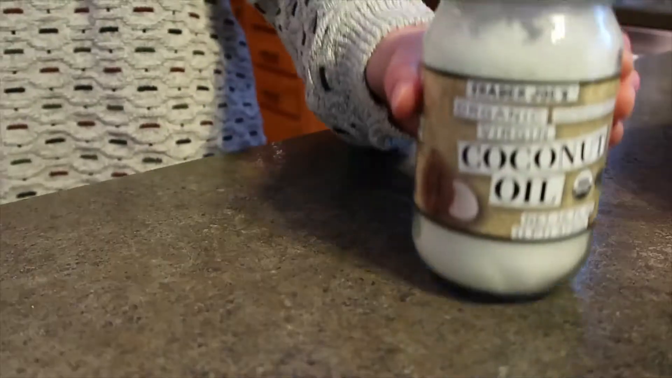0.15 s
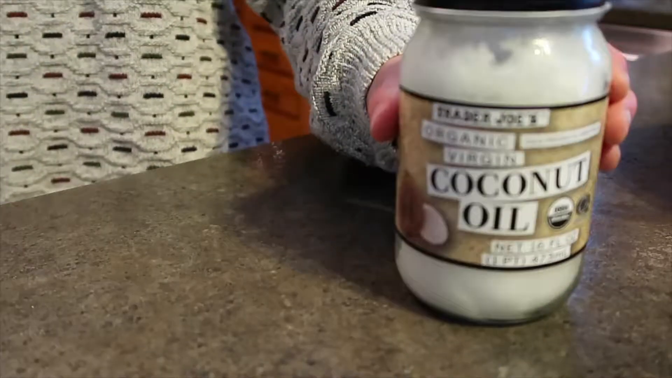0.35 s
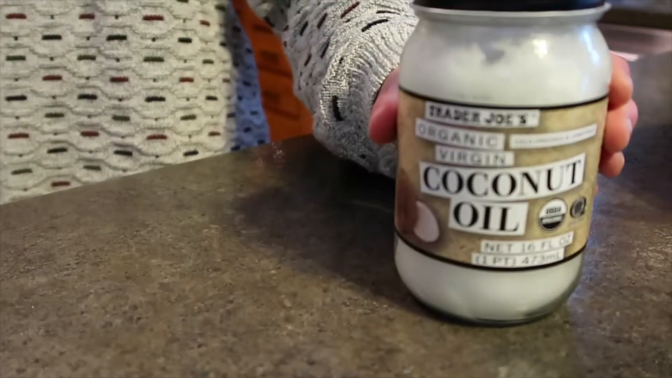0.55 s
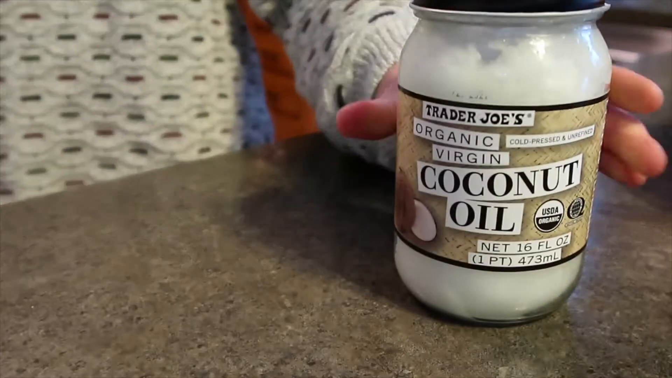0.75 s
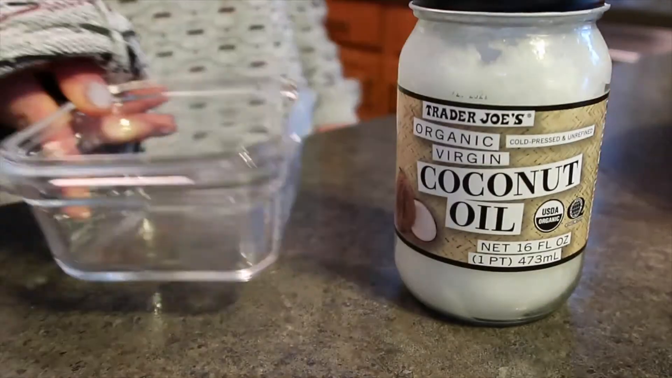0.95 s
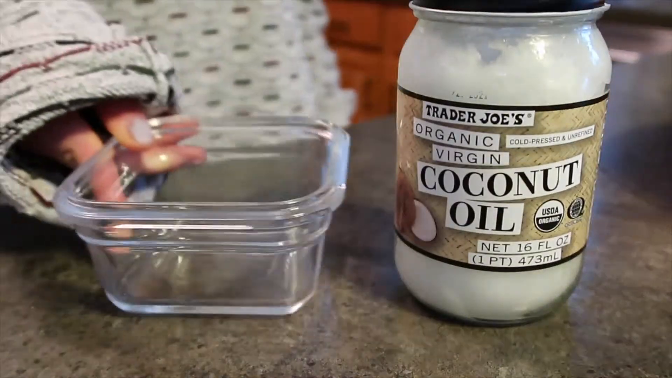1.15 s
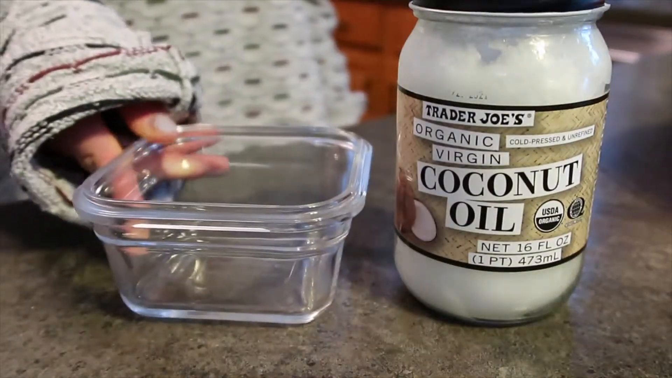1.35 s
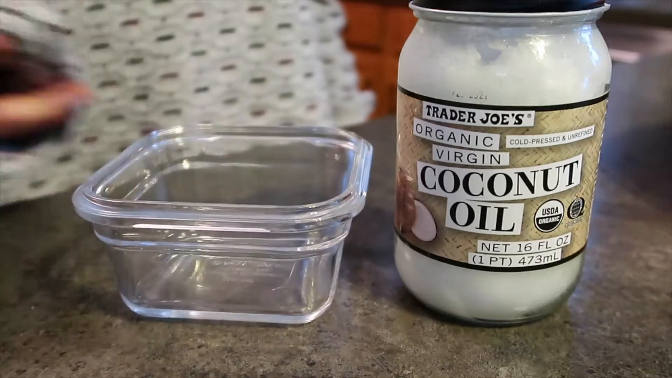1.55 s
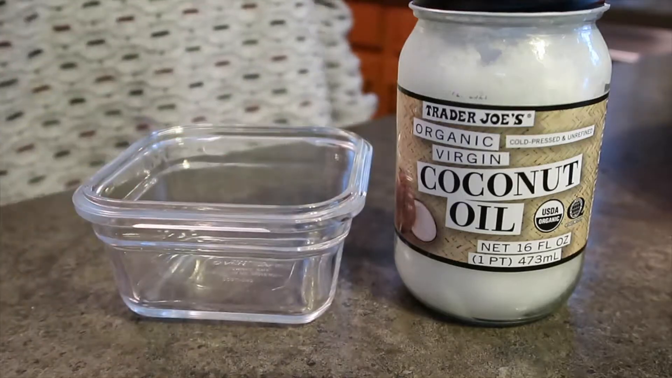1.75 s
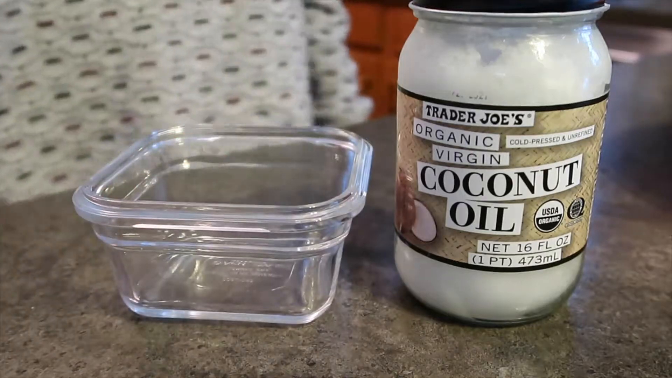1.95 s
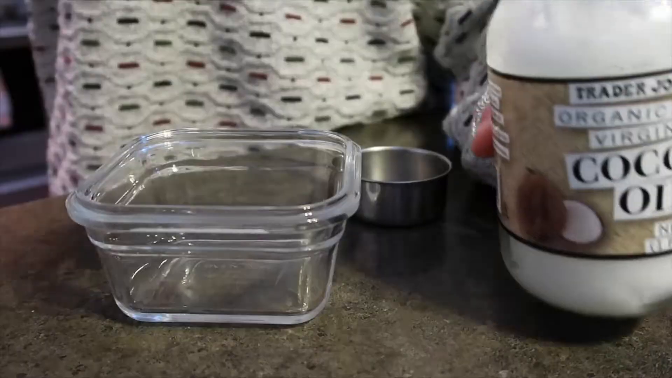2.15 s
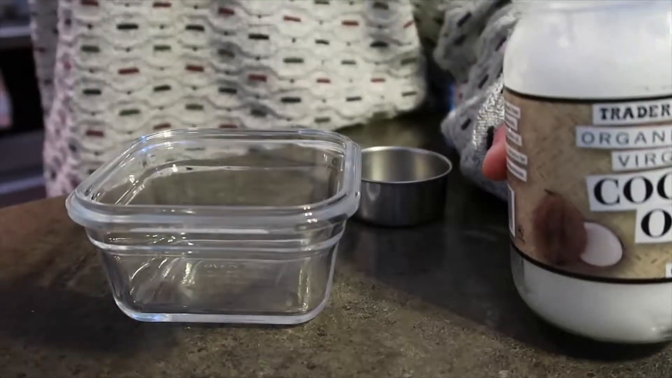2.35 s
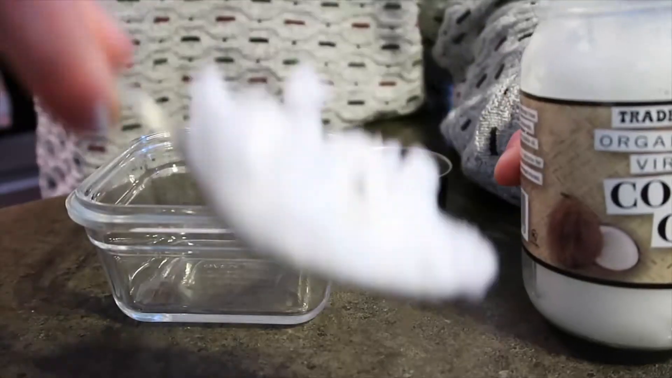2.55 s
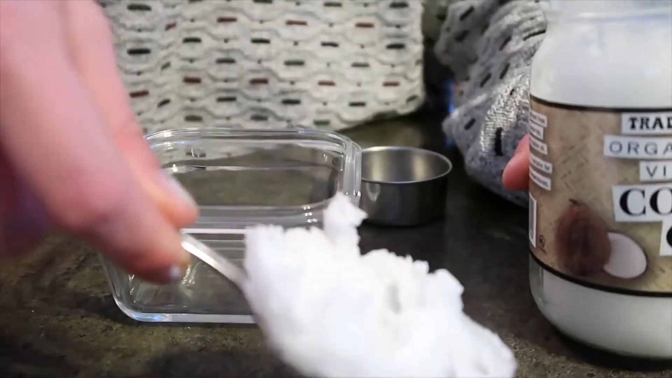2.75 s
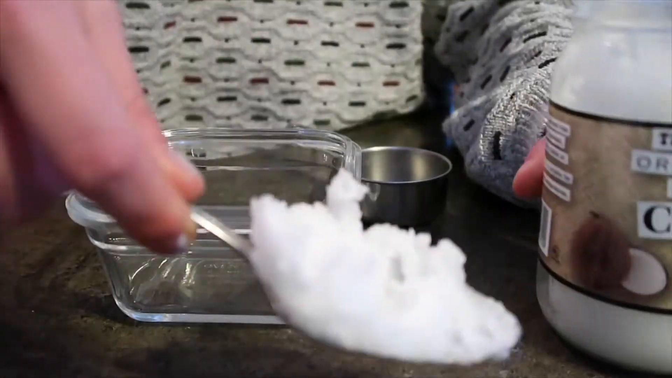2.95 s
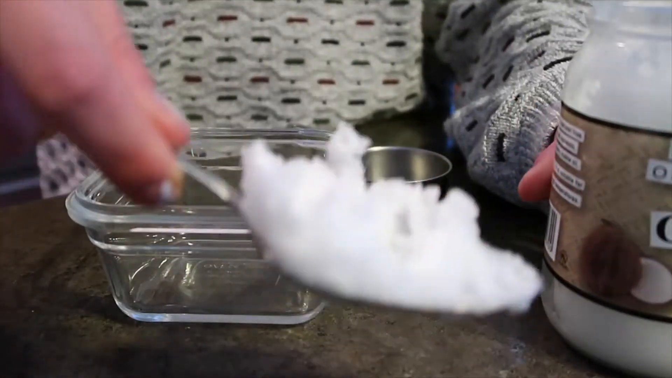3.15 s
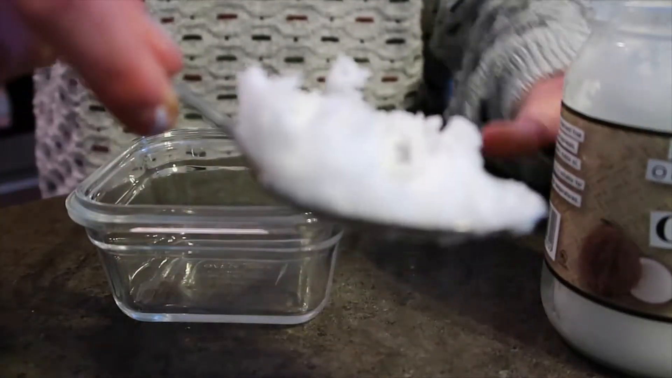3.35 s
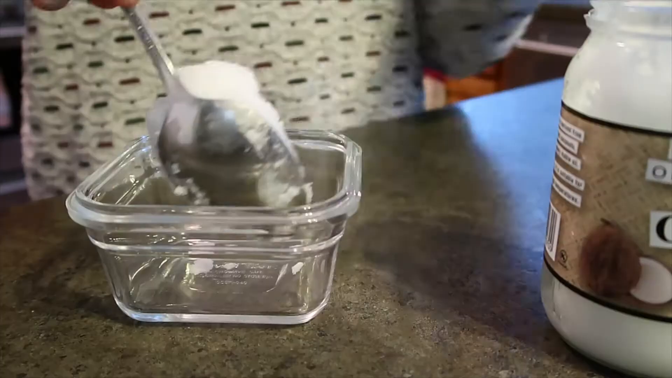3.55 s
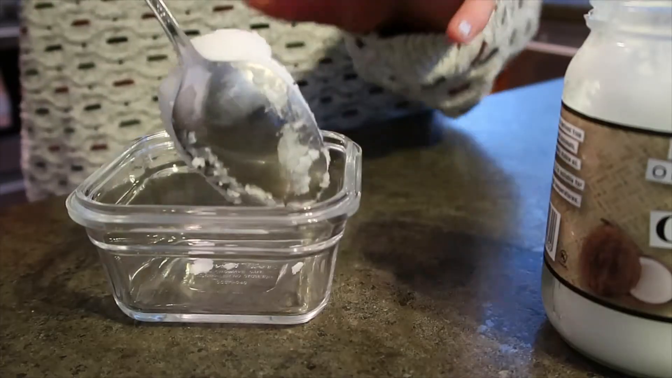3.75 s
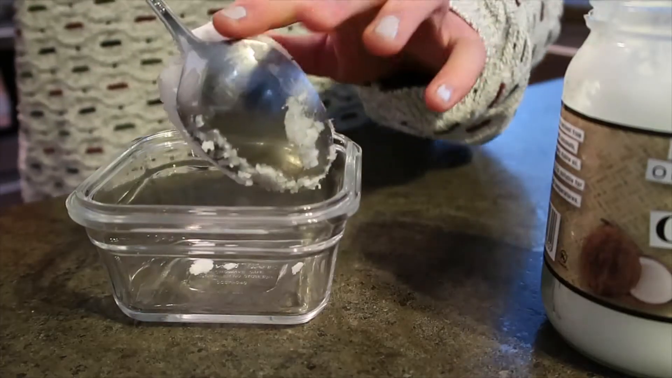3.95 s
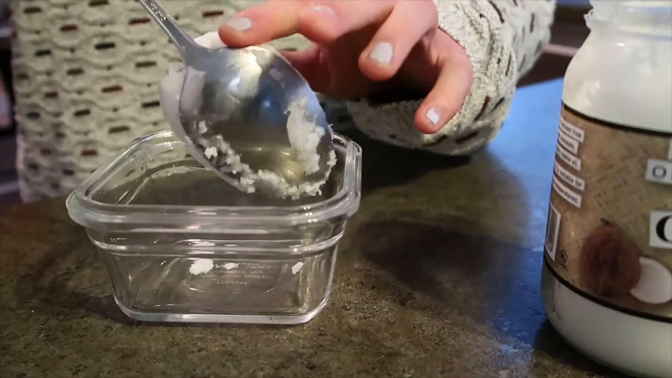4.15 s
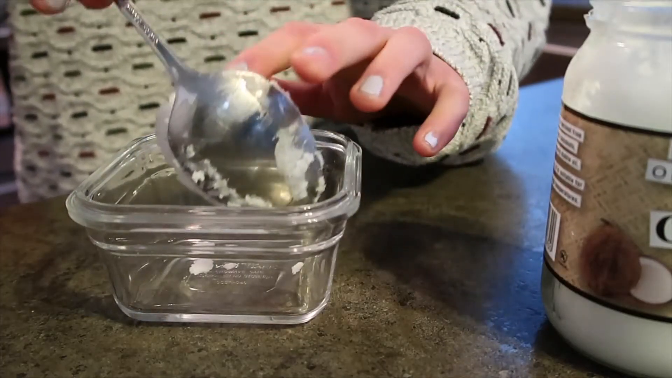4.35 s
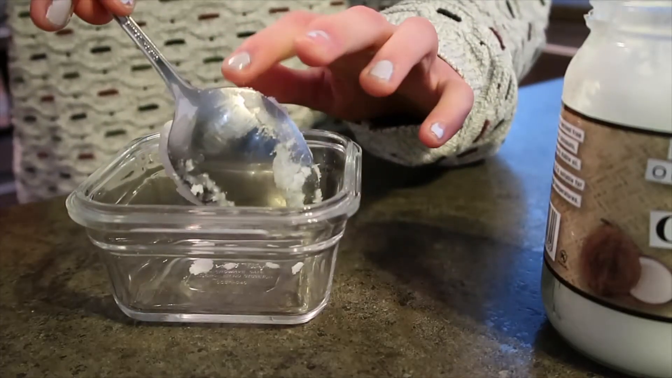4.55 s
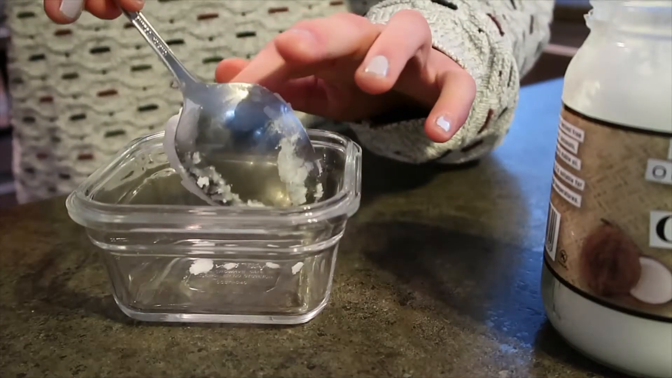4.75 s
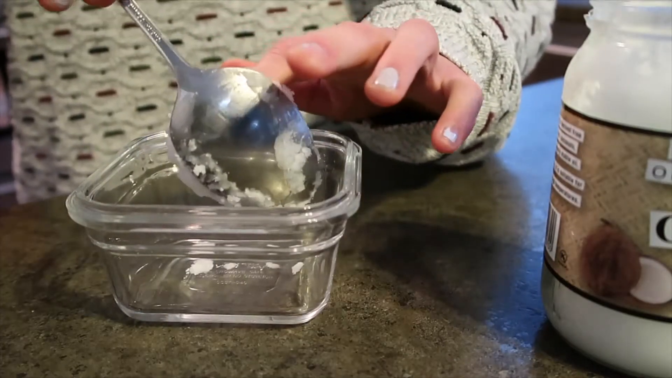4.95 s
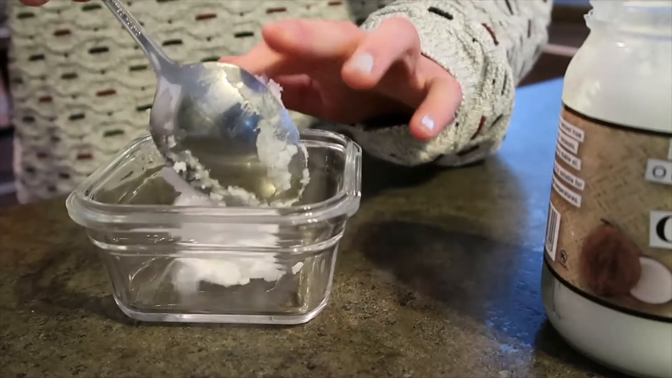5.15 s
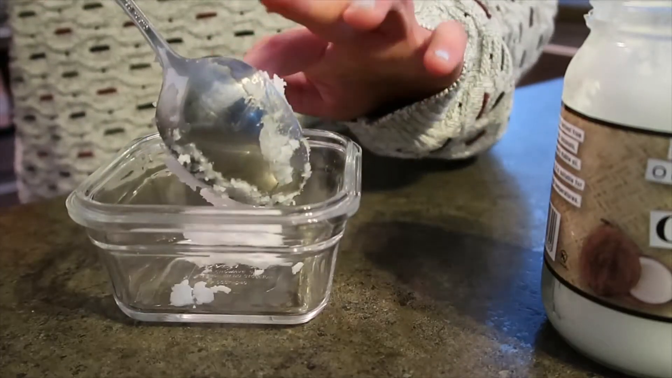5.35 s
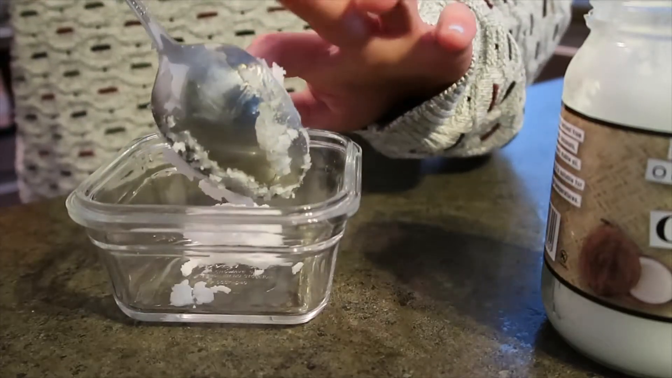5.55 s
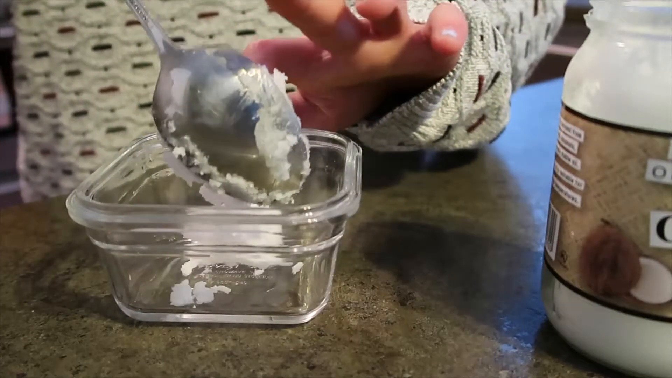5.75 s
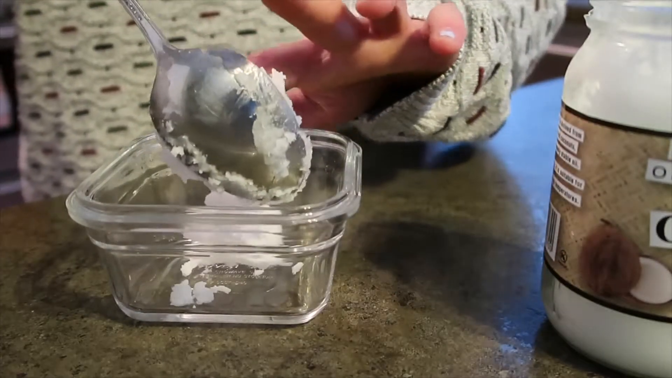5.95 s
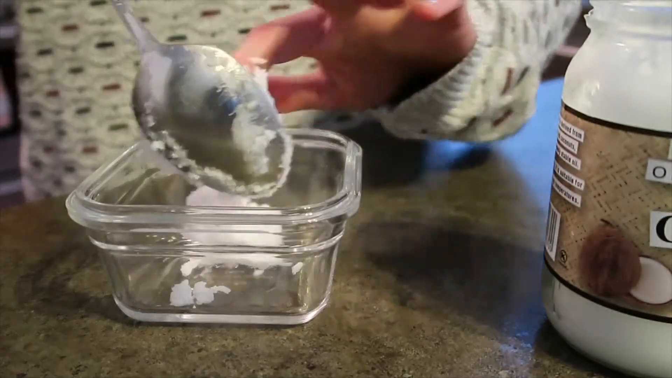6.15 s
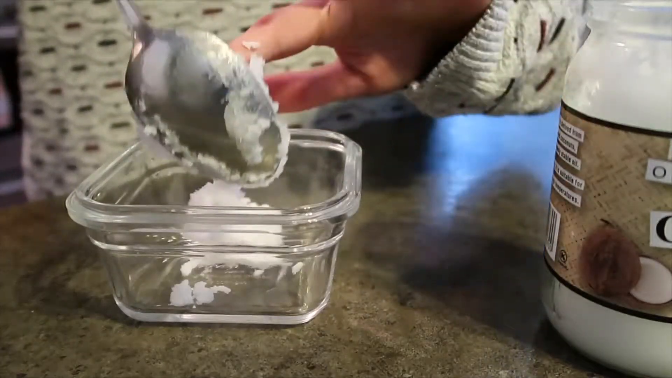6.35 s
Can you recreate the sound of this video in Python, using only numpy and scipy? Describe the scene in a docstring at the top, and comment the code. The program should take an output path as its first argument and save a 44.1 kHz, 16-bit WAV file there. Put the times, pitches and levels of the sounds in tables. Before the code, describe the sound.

A low, steady kitchen hum runs throughout. At the start, wool sleeves brush close to the microphone with a faint, brief whistle. At about 0.2 seconds a full glass jar lands on a hollow countertop with a sharp, boomy knock and rattles until 0.5 seconds. Around 1.2 seconds an empty glass dish comes down with a brighter clatter, settling with a small tap at 1.4 seconds. Near 2.8 and 3.0 seconds the jar rocks from edge to edge in two loud clusters of knocks. Each knock rings briefly in the room. A soft sleeve swish follows around 3.7 seconds. At 4.4 seconds a metal spoon gives one light, bright clink, with fainter ticks just after 5 seconds. From 5.2 to 5.7 seconds, several lumps of solid oil thud softly into the dish. Very faint whistles come near 5.7 seconds, then only the hum remains.

```python
"""A quiet kitchen hums; wool sleeves brush past close to the microphone, with a faint whistle.
A full glass jar, then an empty glass dish, lands on the hollow counter: the glass cracks, the counter
booms, the room rings, and the gain control sinks after the hardest knocks. A spoon ticks, and the jar
is rocked from edge to edge. Last, the spoon clinks brightly and lumps of solid oil thud softly into
the dish, among more faint whistles."""
import sys
import numpy as np
from scipy import signal
from scipy.fft import rfft, irfft, next_fast_len
from scipy.io import wavfile
from scipy.ndimage import uniform_filter1d

SR = 44100
rng = np.random.default_rng(int(sys.argv[2]) if len(sys.argv) > 2 else 0)


def output_pcm(signal):
    """Save a mono or channel-first signal as 16-bit PCM at the path in sys.argv[1].

    Samples are clipped to [-1, 1] before scaling.
    """
    pcm = np.clip(np.atleast_2d(signal).T, -1, 1) * 32767
    wavfile.write(sys.argv[1], SR, np.round(pcm).astype(np.int16))


N = 282410

# colour of the room tone: f/Hz, level/dB
ROOM_COLOUR = [(20, -3), (35, -14.5), (60, -6), (100, 3), (200, -4), (320, 1.5), (500, -8.5), (1000, -15.5),
               (2000, -21.5), (3500, -26), (5000, -30.5), (8000, -36.5), (11000, -42), (15000, -50.5)]
# how centred the room tone sits: f/Hz, left-right correlation
ROOM_LIKENESS = [(25, .9), (60, 1), (130, 0.986), (290, 0.84), (640, 0.54), (1420, 0.26), (3120, 0),
                 (7000, 0), (12000, 0)]
# wavering hums: f/Hz, width/Hz, level/dB
HUMS = [(150.46, 19, -52.5), (203.63, 13, -53), (955.3, 18, -69)]
# stretches between which the room tone steps in level: start t/s, level/dB
STRETCHES = [(0, 2), (0.872, 0), (2.104, 1)]
# sleeve swishes: t/s, length/s, level/dB, tilt/(dB per octave)
SLEEVES = [(-.25, 0.91, -54, -0.88), (0.357, 0.621, -58.5, 3), (0.907, 0.56, -54, 2),
           (1.301, 0.375, -59, 1.5), (1.889, 0.257, -62.5, 2.5), (3.498, 0.493, -60.5, 2.5),
           (4.711, 0.031, -57.5, 1.5)]
# colour of rubbing wool: f/Hz, level/dB
WOOL = [(300, -16), (800, 3), (1600, 6.5), (3000, 1), (5000, -10), (7500, -19), (11000, -45)]
# faint whistles: t/s, length/s, f/Hz, level/dB
WHISTLES = [(.07, 0.28, 1596, -53), (5.576, 0.1, 1977, -63.5), (5.691, 0.14, 1993, -69),
            (5.787, 0.068, 3530, -67)]
# where hits land: jar, dish, the jar's near edge, its far edge, lump
PLACES = ["jar", "dish", "near edge", "far edge", "lump"]
# hits on the counter: t/s, level/dB, contact time/ms, place
HITS = [(0.2206, -4, 0.1069, "jar"), (.243, -10, 0.312, "jar"), (0.271, -21.5, 0.35, "jar"),
        (0.29, -18, 0.272, "jar"), (0.314, -17.5, 0.376, "jar"), (0.339, -21.5, 0.23, "jar"),
        (0.3553, -13.5, 0.291, "jar"), (.364, -13.5, 0.35, "jar"), (0.375, -19, 0.212, "jar"),
        (0.398, -26.5, 0.416, "jar"), (0.429, -27, 0.405, "jar"), (0.458, -24.5, 0.52, "jar"),
        (1.1705, -6.5, 0.1497, "dish"), (1.179, -22.5, 0.32, "dish"), (1.191, -17.5, 0.334, "dish"),
        (1.229, -13.5, 0.24, "dish"), (1.2362, -9.5, 0.188, "dish"), (1.2375, -8.5, 0.2296, "dish"),
        (1.2446, -21.5, 0.23, "dish"), (1.2564, -21.5, 0.21, "dish"), (1.2982, -30, 0.39, "dish"),
        (1.396, -22.5, 0.2825, "dish"), (1.402, -36, 0.33, "dish"), (1.404, -23.5, 0.463, "dish"),
        (2.822, -3.5, 0.2677, "near edge"), (2.842, -16.5, 0.59, "near edge"),
        (2.854, -16, 0.263, "near edge"), (2.8743, -14, 0.334, "near edge"),
        (2.891, -13.5, 0.532, "near edge"), (3.0354, -18.5, 0.402, "far edge"),
        (3.038, -10, 0.363, "far edge"), (3.0418, -11.5, 0.55, "far edge"),
        (3.048, -13.5, 0.2177, "far edge"), (3.054, -11.5, 0.2815, "far edge"),
        (3.0889, -16.5, 0.533, "far edge"), (3.288, -48, 0.0253, "far edge"), (5.198, -35, 0.327, "lump"),
        (5.34, -32, 0.232, "lump"), (5.555, -34.5, 0.272, "lump"), (5.670, -34, 0.249, "lump"),
        (5.687, -29, 0.435, "lump")]
# modes of counter and glass: f/Hz, t60/s, then level/dB for each place
MODES = [(98.3, 0.084, -17.5, -27.5, -20.5, -29.5, -7.5), (192.64, 0.34, -29, -24.5, -20.5, -13.5, -31.5),
         (221, 0.15, -23.5, -28, -28, -20, -36.5), (246.74, 0.13, -1, -30.5, -8, -1, -35),
         (281, 0.19, -6.5, -28, -5.5, -24, -40), (287.6, 0.244, 2.5, -20.5, -10, -13, -33.5),
         (324.64, 0.15, -11.5, -24.5, -30.5, -7.5, -38.5), (347.2, 0.1, -11.5, -17, -28.5, -30.5, -38),
         (357, 0.03, 6, -14, -17, -30, -37), (372.3, 0.058, 0.5, -4, -10.5, -31, -26),
         (390.4, 0.088, -16, -17.5, -24.5, -31, 6.5), (394.06, 0.18, -8, -7.5, -10.5, -2.5, -4),
         (412.4, 0.15, -2, -15, -21, -3.5, -31), (460, 0.085, -16.5, -15, -30, -28, -29.5),
         (481.6, 0.058, 3.5, -3.5, -24.5, -18, 0.5), (503.1, 0.064, -13.5, -5.5, -19, -21, -23),
         (534.95, 0.16, -18.5, -7.5, -16.5, -8, -6), (566.4, 0.15, -9.5, -11.5, -24.5, -24.5, -22.5),
         (649.2, 0.17, -17, -13, -30.5, -32.5, -26.5), (679.4, 0.19, -4, -13, -35.5, -29.5, -10.5),
         (803.5, 0.14, -30.5, -10, -22.5, -26, -32.5), (918, 0.076, -7, -31.5, -12, -11, -3),
         (1184, 0.06, -24.5, -16, -37, -27, -32.5), (1289.2, 0.03, -2.5, -7.5, -6.5, -19.5, -24.5),
         (1645, 0.011, -1.5, 9.5, -31.5, -23, -19), (1680, 0.16, -49.5, -17, -52.5, -22.5, -50.5),
         (2450, 0.021, -27, -30.5, -7, -16.5, -28.5), (2706, 0.0075, 7, 8.5, -1.5, -27, -32.5),
         (2694, 0.1, -49, -26, -45.5, -38, -55.5), (3568, .012, -8, -11.5, -7, -28, -46),
         (3533, 0.16, -62, -21.5, -45, -43, -59.5)]
# dense modes, heard as a short clatter: f/Hz, t60/s, then level/dB for each place
CLATTER = [(100, 0.069, -4.5, -22, -20, -16, -44.5), (285, 0.072, -15.5, -16, -11.5, -3.5, -21),
           (748, 0.081, -16, -9, -22.5, -32, -6.5), (1597, 0.014, 1, 6, -15.5, -6.5, -26.5),
           (2190, 0.022, 1, -14.5, -8.5, -8.5, -14.5), (2800, 0.016, -8.5, 3, -14.5, -10.5, -19.5),
           (4300, 0.023, -22, -14, -19, -14, -30.5), (6300, 0.011, -11, -29.5, -16, -35.5, -39.5),
           (11860, .007, -34, -29, -46, -53, -51)]
# stereo position of each place: left lag/microseconds, left minus right level/dB
PANS = [(23.5, 0), (28.5, 0.5), (-19.5, 0.73), (-35.5, -0.78), (-18, 0.7)]
# reverb decay: f/Hz, t60/s
REVERB_DECAY = [(100, 0.49), (300, 0.393), (1000, 0.567), (3000, 0.448), (6000, 0.38), (12000, 0.269)]
# reverb colour: f/Hz, level/dB
REVERB_COLOUR = [(60, -11.5), (150, -5), (400, -3.5), (900, -2), (1800, -4.5), (4000, -4), (7000, -2),
                 (12000, -4.5)]
# reverb width: f/Hz, side-to-mid ratio
REVERB_WIDTH = [(50, .25), (200, 0.13), (700, 0.096), (2000, .19), (5000, 0.45), (10000, 0.88)]
# modes of the spoon: f/Hz, level/dB, t60/s
SPOON_MODES = [(4402, 1, 0.068), (5830, -26, 0.093), (8300, -33, 0.072)]
# spoon clinks: t/s, level/dB
CLINKS = [(1.425, -56), (4.419, -37.5), (4.461, -69.5), (4.476, -70.5), (4.527, -67), (5.111, -53.5),
          (5.128, -55.5), (5.196, -64), (5.262, -66), (5.371, -61.5)]

MAINS_HZ, MAINS_DB = 59.64, -54.5
SPOT_DB, SPOT_DETUNE = 1.97, 0.0087  # no two hits land alike: scatter of mode level and pitch
GLASS_ABOVE_HZ, COUNTER_LAG_S = 1100, 0.000253
REVERB_DB, GLASS_SEND_DB = -9, -7.5  # glass and spoon beam at the microphone, less at the walls
DUCK_FROM_DB, DUCK_SHARE, DUCK_S, RECOVER_DB_PER_S = -2.5, 0.737, 0.027, 9
HISS_DB, HISS_HZ, CLIP_HARDNESS, TOP_HZ = -62, 3980, 8.3, 15300


def gain_of(db):
    """Decibels to gain."""
    return 10 ** (np.asarray(db) / 20)


def curve(points, hz):
    """A table's value at hz, on a log frequency axis."""
    f, value = np.transpose(points)
    return np.interp(np.log(hz + 1), np.log(f + 1), value)


def add(mix, s, sound):
    """Mixes a sound in at s seconds."""
    part = mix[round(s * SR):][:len(sound)]
    part += sound[:len(part)]


def narrow_noise(hz, width, count):
    """Noise in one resonance, rms about 1."""
    r = np.exp(-np.pi * width / SR)
    slow = signal.lfilter([1], [1, -r], rng.standard_normal((2, count + SR // 4)))[:, SR // 4:]
    turn = 2 * np.pi * hz * np.arange(count) / SR
    return (slow[0] * np.cos(turn) + slow[1] * np.sin(turn)) * np.sqrt(1 - r * r)


def room_tone():
    """The bed: drifting noise, wavering hums and steady mains hum, stepping in level twice."""
    frames, hz = N // 256 + 5, np.fft.rfftfreq(1024, 1 / SR)
    mid_re, mid_im, side_re, side_im, drift = rng.standard_normal((frames, 513, 5)).T
    drift = uniform_filter1d(uniform_filter1d(drift, 10, 0), 10, 1) * 10
    likeness = np.clip(curve(ROOM_LIKENESS, hz), 0, 1)[:, None]
    mid = mid_re + 1j * mid_im
    side = np.sqrt((1 - likeness) / (1 + likeness)) * (side_re + 1j * side_im)
    colour = gain_of(curve(ROOM_COLOUR, hz))[:, None]
    spectra = np.array([mid + side, mid - side]) * colour * gain_of(0.18 * drift)
    air = gain_of(-57.5) * signal.istft(spectra, nperseg=1024, noverlap=768)[1][:, :N]
    hums = sum(gain_of(db) * narrow_noise(f, width, N) for f, width, db in HUMS)
    mains = gain_of(MAINS_DB) * np.sqrt(2) * np.sin(2 * np.pi * MAINS_HZ * np.arange(N) / SR)
    starts, level_db = np.transpose(STRETCHES)
    stretch = np.searchsorted(starts[1:] * SR, np.arange(N))
    return (air + hums + mains) * gain_of(level_db[stretch])


def sleeves():
    """Knitted wool brushes past: one swell of noise per movement, each with its own brightness."""
    t, size, out = np.arange(N) / SR, next_fast_len(N), np.zeros(N)
    hz, fibres = np.fft.rfftfreq(size, 1 / SR), rfft(rng.standard_normal(size))
    for s, length, db, tilt in SLEEVES:
        colour = gain_of(curve(WOOL, hz) + tilt * np.log2(hz / 2000 + .01))
        swish = irfft(fibres * colour, size)[:N]
        swell = np.sin(np.pi * np.clip((t - s) / length, 0, 1))
        out += gain_of(db) * swell * swish / swish.std()
    return out


def whistles():
    """Faint, short tones that waver with the narrow noise around them."""
    out = np.zeros(N)
    for s, length, hz, db in WHISTLES:
        t = np.arange(0, length, 1 / SR)
        waver = np.sqrt(2) * 0.53 * narrow_noise(hz, width=23, count=len(t))
        tone = np.sin(2 * np.pi * hz * t) + waver
        add(out, s, gain_of(db) * tone * signal.windows.tukey(len(t), .4))
    return out


def ring(modes):
    """Struck modes (f/Hz, level/dB, t60/s): dying tones that all start at their crest."""
    impulse, out = np.eye(1, 16384)[0], 0
    for hz, db, t60 in modes:
        r, c = gain_of(-60 / (t60 * SR)), np.cos(2 * np.pi * hz / SR)
        out = out + gain_of(db) * signal.lfilter([1, -r * c], [1, -2 * r * c, r * r], impulse + 1e-30)
    return out


def soften(sound, ms):
    """Drives a sound with a smooth push of area 1: the longer the contact, the duller the hit."""
    u = np.arange(400) / SR / (max(ms, .01) / 1000)
    force = u * u * np.exp(-u)
    return signal.oaconvolve(sound, force / force.sum())


def clatter(place):
    """Crowded modes blur into a noise burst, each band dying at its own speed."""
    t, hz = np.arange(4096) / SR, np.fft.rfftfreq(4096, 1 / SR)
    noise, centres = rfft(rng.standard_normal(4096)), [row[0] for row in CLATTER]
    out = 0
    for (_, t60, *levels), share in zip(CLATTER, np.eye(len(CLATTER))):
        band = irfft(noise * curve(list(zip(centres, share)), hz))
        out = out + band / band.std() * gain_of(levels[place] - 60 * t / t60)
    return out


def knocks(place):
    """Rings and thuds at one place: the glass cracks first, the heavy counter answers the other way."""
    rings, thuds = np.zeros((2, N))
    for s, db, ms in [hit[:3] for hit in HITS if hit[3] == PLACES[place]]:
        scatter = rng.standard_normal((len(MODES), 2))
        modes = [(hz * (1 + SPOT_DETUNE * detune), levels[place] + SPOT_DB * lift, t60)
                 for (hz, t60, *levels), (detune, lift) in zip(MODES, scatter)]
        glass = ring([mode for mode in modes if mode[0] > GLASS_ABOVE_HZ])
        counter = ring([mode for mode in modes if mode[0] <= GLASS_ABOVE_HZ])
        add(rings, s, -gain_of(db) * soften(glass, 0.384 * ms))
        add(thuds, s, gain_of(db) * soften(clatter(place), 0.442 * ms))
        add(thuds, s + COUNTER_LAG_S, gain_of(db) * soften(counter, ms))
    low_cut = signal.butter(2, 60, "high", fs=SR)  # a counter radiates little deep bass
    return signal.lfilter(*low_cut, [rings, thuds])


def pan(x, lag_us, pan_db):
    """Two close microphone ports: a small delay and level difference between them."""
    size = next_fast_len(N)
    hz, ports = np.fft.rfftfreq(size, 1 / SR), np.array([[1], [-1]]) / 2
    delay = np.exp(-2j * np.pi * hz * ports * lag_us / 1e6)
    return irfft(rfft(x, size) * gain_of(ports * pan_db) * delay, size)[:, :N]


def kitchen_reverb(send):
    """Wall echoes: sparse taps of random sign, each band dying at its own speed, widest in the treble."""
    taps = np.zeros((2, SR))
    arrivals = np.arange(200, SR - 20, 20) + rng.integers(0, 20, (2, (SR - 201) // 20))
    np.put_along_axis(taps, arrivals, rng.choice([-1., 1.], arrivals.shape), 1)
    hz, t, spectra = signal.stft(taps, SR, nperseg=512)
    decay_db = 60 * t / curve(REVERB_DECAY, hz)[:, None]
    mid, side = spectra * gain_of(curve(REVERB_COLOUR, hz)[:, None] - decay_db)
    side = side * np.clip(curve(REVERB_WIDTH, hz), 0, 1)[:, None]
    tail = signal.istft(np.array([mid + side, mid - side]), SR, nperseg=512)[1]
    return signal.fftconvolve(send[None], tail / np.linalg.norm(tail[0]), axes=1)[:, :N]


def spoon():
    """Each clink rings the spoon's three bright modes, with a softened attack."""
    out = np.zeros(N)
    clink = ring(SPOON_MODES) * np.minimum(np.arange(16384) / 30, 1)
    for s, db in CLINKS:
        add(out, s, gain_of(db) * clink)
    return out


def scene():
    """Everything on the counter rings into the kitchen, over room tone and sleeves."""
    stems = [knocks(place) for place in range(len(PLACES))]
    details = whistles() + spoon()
    direct = details + sum(pan(rings + thuds, *at) for (rings, thuds), at in zip(stems, PANS))
    rings, thuds = sum(stems)
    reverb = kitchen_reverb(gain_of(GLASS_SEND_DB) * (details + rings) + thuds)
    return direct + gain_of(REVERB_DB) * reverb + room_tone() + sleeves()


def gain_control(x):
    """After an overload the gain ducks quickly and creeps back."""
    creep = np.arange(x.shape[1]) * RECOVER_DB_PER_S / SR
    peak_db = 20 * np.log10(abs(x).max(0) + 1e-9)
    held_db = np.maximum.accumulate(peak_db + creep) - creep
    over_db = np.maximum(held_db - DUCK_FROM_DB, 0)
    r = np.exp(-1 / (DUCK_S * SR))
    return x / gain_of(DUCK_SHARE * signal.lfilter([1 - r], [1, -r], over_db))


def record(dry):
    """Microphone chain: low cut, gain control reset for each stretch, preamp hiss, clipping, high cut."""
    thinned = signal.lfilter(*signal.butter(1, 30, "high", fs=SR), dry)
    stretches = np.split(thinned, [round(start * SR) for start, _ in STRETCHES[1:]], axis=1)
    hiss = signal.lfilter(*signal.butter(2, HISS_HZ, fs=SR), rng.standard_normal(dry.shape))
    x = np.hstack([gain_control(stretch) for stretch in stretches]) + gain_of(HISS_DB) * hiss
    clipped = x / (1 + abs(x) ** CLIP_HARDNESS) ** (1 / CLIP_HARDNESS)
    high_cut = signal.firwin(255, TOP_HZ, window=("kaiser", 8), fs=SR)
    return signal.oaconvolve(clipped, high_cut[None], "same")


dry = scene()
out = record(dry)
output_pcm(out)
```